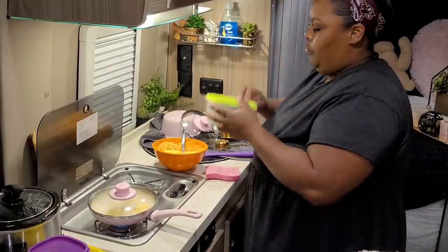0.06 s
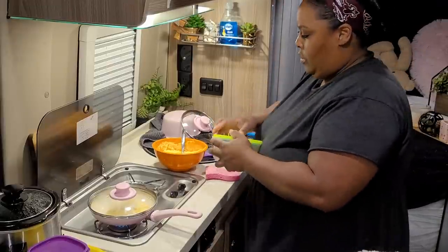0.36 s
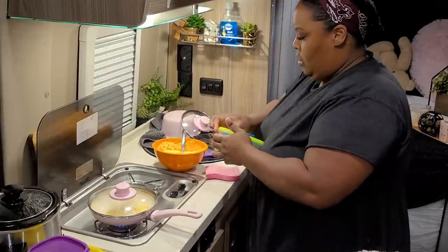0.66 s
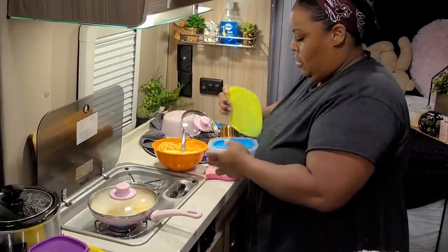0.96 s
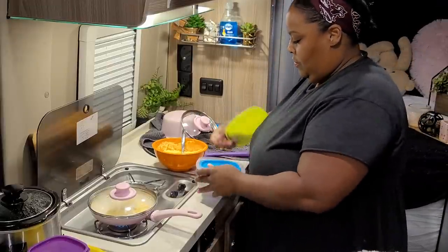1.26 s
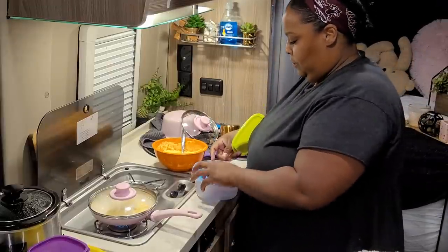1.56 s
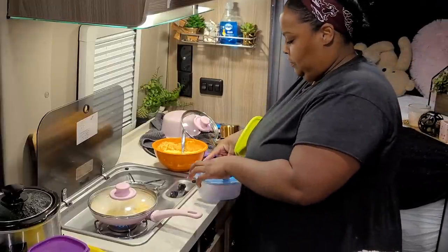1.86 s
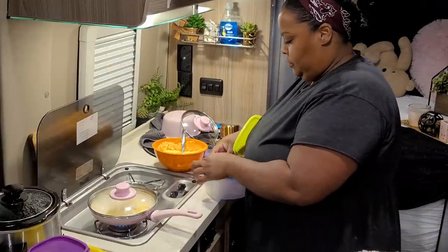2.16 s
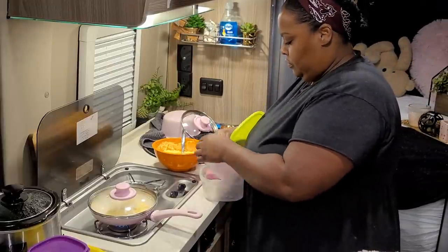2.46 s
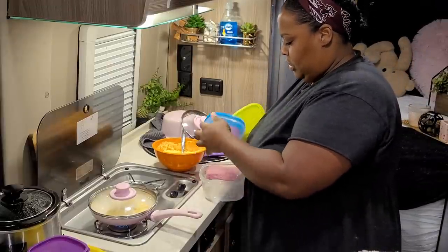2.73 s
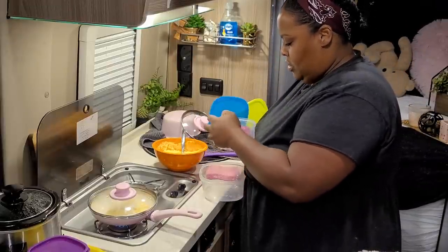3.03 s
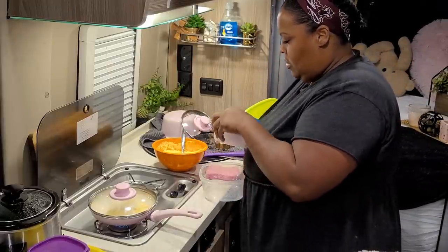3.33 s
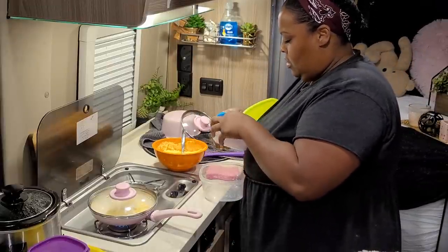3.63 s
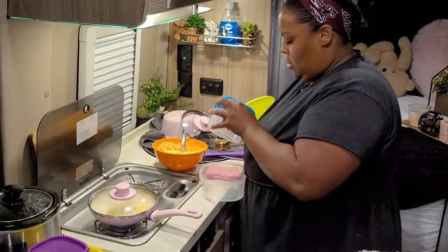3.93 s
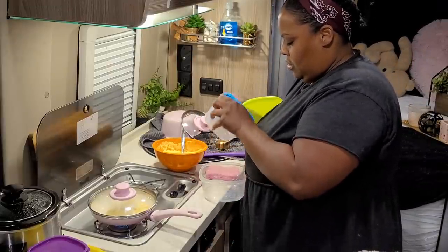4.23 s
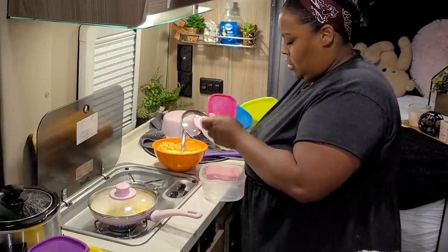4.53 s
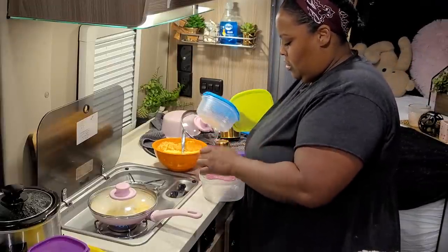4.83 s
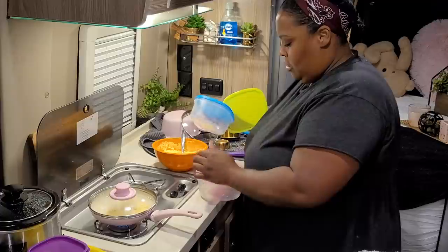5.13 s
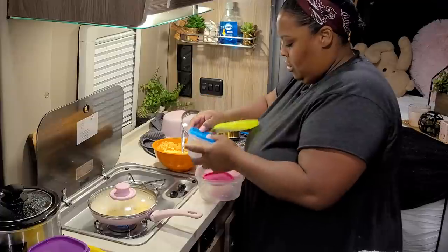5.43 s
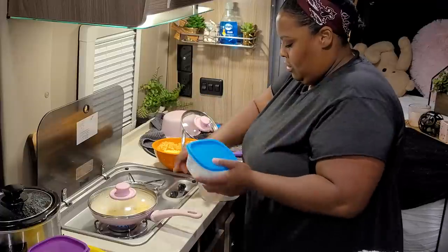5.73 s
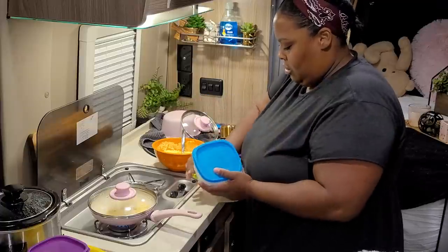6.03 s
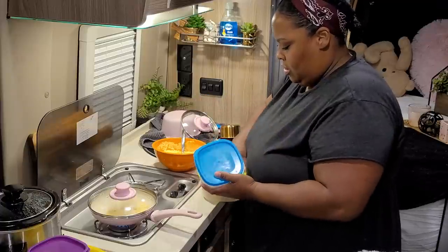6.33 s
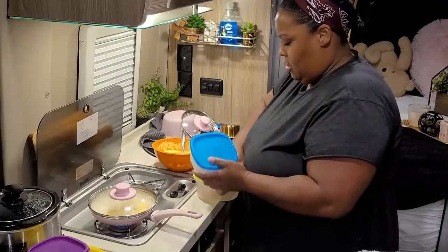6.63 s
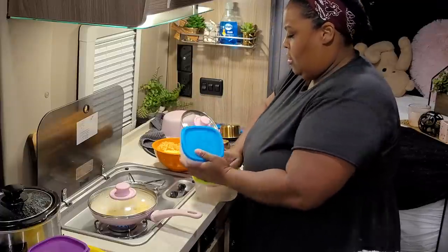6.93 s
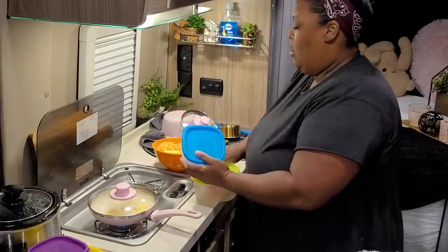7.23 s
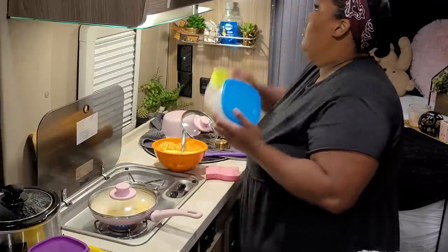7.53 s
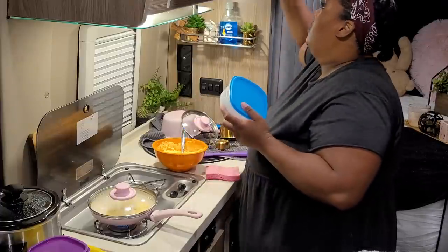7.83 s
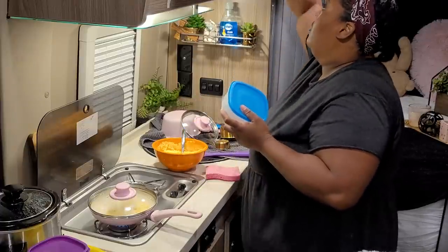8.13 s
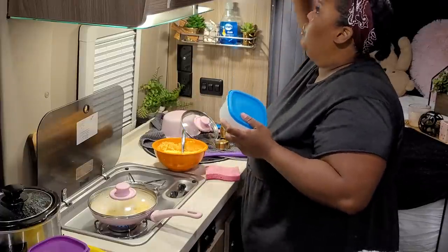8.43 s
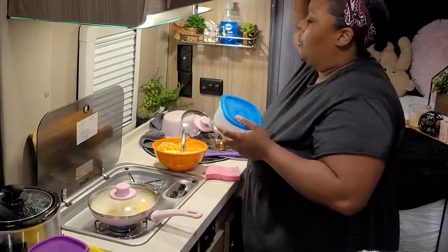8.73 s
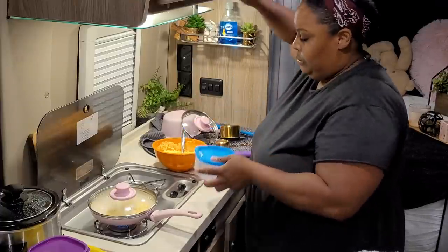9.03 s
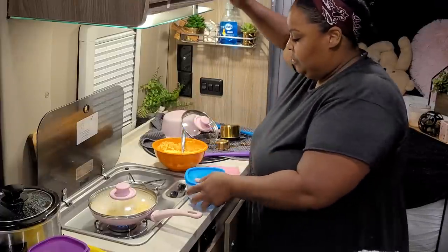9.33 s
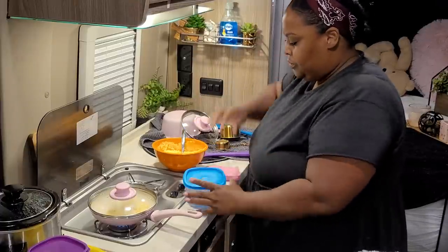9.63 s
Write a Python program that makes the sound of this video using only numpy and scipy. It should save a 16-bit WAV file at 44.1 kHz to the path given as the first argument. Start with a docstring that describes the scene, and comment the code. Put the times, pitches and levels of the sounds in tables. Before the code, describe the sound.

Hands sort plastic containers and lids with hollow clacks and short scrapes in a small kitchen, before a cupboard door slams.

```python
"""A cramped kitchen: plastic food tubs and lids are sorted by hand and knock, click and scrape together.
Each contact rings a thin wall and a stiff rim and echoes off the near cupboards. Fingertips rustle and
squeak on the plastic. Near the end a cupboard door bangs shut, booming through the cabinets and
overloading the microphone. An appliance hums faintly underneath, with a soft hiss of room air."""
import sys
import numpy as np
from scipy import signal
from scipy.fft import rfft, irfft
from scipy.io import wavfile

SR = 44100
rng = np.random.default_rng(int(sys.argv[2]) if len(sys.argv) > 2 else 0)


def log_audio(samples):
    """Write samples as a 16-bit WAV file to the path given in sys.argv[1]."""
    # one column per channel
    frames = np.atleast_2d(samples).T
    # limit to full scale, then quantise
    limited = np.clip(frames, -1, 1)
    pcm = np.round(limited * 32767).astype(np.int16)
    wavfile.write(sys.argv[1], SR, pcm)


N = 435708
RING_TIME = np.arange(int(SR / 4)) / SR  # seconds since a contact
FREQS = np.fft.rfftfreq(N, 1 / SR)

# Knocks and clicks. Thud (bass), hollow (low middle) and snap (treble) are relative to the level.
# (time [s], piece, level [dB], thud [dB], hollow [dB], snap [dB], contact time [s])
KNOCKS = [(0.084, "tight lid", -54, -6, -2, 0, 0.0017), (0.227, "seal", -36, -16, -4.5, -30, 0.00051),
          (.733, "tub side", -27, -15, 1, -3, 0.0017), (.775, "seal", -29, -21, -5, -7, .0024),
          (0.83, "tub side", -28.5, -30, 2, -25, 0.0021), (.922, "tub side", -35, -16, 2, -11, 0.0023),
          (1.288, "seal", -12.5, -22, 0.5, -12, 0.00067), (1.349, "seal", -13.5, -7, -1, -7, 0.0019),
          (1.375, "large lid", -22, -6, 3, -8, 0.00042), (1.399, "tub side", -20.5, -10, -2, -13, 0.0021),
          (1.445, "tub base", -31.5, -9, -4, -10, 0.0035), (1.485, "tub side", -33, -5.5, 0, -15, .001),
          (1.634, "tub side", -41.5, -2.5, -9, -22, 0.0021), (1.674, "tub base", -36.5, -13, -2, -12, .002),
          (1.818, "nested", -21.5, -21, -2.5, -5.5, 0.0044),
          (1.866, "tub side", -29.5, -8, -1, -14, 0.0025), (2.074, "seal", -39.5, -21, -3, -10, 0.0025),
          (2.264, "large tub", -23, -4, -23, -10, 0.0032), (2.333, "large lid", -26, -2.5, -23, -9, 0.004),
          (2.397, "small tub", -31, -12, 0, -11, .0016), (2.455, "small tub", -26.5, -25, 7, -6, 0.0016),
          (2.475, "small tub", -29.5, -18, 6.5, -15, 0.00054),
          (2.502, "small tub", -29.5, -29, 7.5, -10.5, 0.0033),
          (2.574, "small tub", -29.5, -26, 3, -3, 0.00069),
          (2.602, "small tub", -38.5, -21, 8.5, -13, .001), (2.715, "seal", -41.5, -28, -13, -10, .001),
          (2.754, "tub base", -31, -34, 2.5, -11.5, .0006),
          (2.799, "small tub", -43.5, -26, -4, -0.5, 0.003),
          (2.897, "small tub", -37.5, -24, 4.5, -10, 0.00055),
          (2.915, "small lid", -30, -37, -4, -10, .0017),
          (3.057, "small lid", -35.5, -34, -2.5, -13, 0.0024),
          (3.26, "small lid", -30.5, -11.5, -4.5, -18.5, 0.0099),
          (3.316, "tub base", -42, -25, 4.5, -16, .0006), (3.656, "tub base", -24.5, -19, 2.5, -9, .0006),
          (3.845, "small tub", -30, -34, 0.5, -12, 0.00046),
          (4.281, "large lid", -27.5, -35, -5, -26, 0.0023),
          (4.301, "small lid", -32, -32, 1.5, -25, 0.0026),
          (4.345, "tub base", -39.5, -25, 8.5, -20, 0.0027),
          (4.451, "small lid", -24.5, -17, -0.5, -6.5, 0.00069),
          (4.474, "small lid", -23.5, -15, -1.5, -7.5, 0.0056),
          (4.562, "small lid", -29.5, -28, -37, -17, 0.0028),
          (4.978, "tub base", -16.5, -24, 3, -5, 0.00061), (4.982, "seal", -14, -12, -18, -27, 0.0012),
          (5.03, "tub base", -30.5, -9, -6, -5.5, 0.00084),
          (5.062, "nested", -18.5, -10, -1, -7.5, 0.00072), (5.112, "tub base", -27, -8, 0, -17, .002),
          (5.123, "small tub", -20, -4, 3.5, -1.5, 0.00037),
          (5.163, "nested", -25.5, -4.5, 1.5, -2, 0.0005), (5.203, "nested", -22.5, -12, 1, -6.5, 0.00066),
          (5.218, "tight lid", -31.5, -5.5, -3, -1, .0014), (5.252, "nested", -27.5, -2, -18, -6.5, 0.0029),
          (5.302, "large lid", -33, -22, -3, -22, 0.0016), (5.378, "small tub", -32, -24, -0.5, -5, .0015),
          (5.68, "large lid", -18, -20.5, -25, -8, 0.0009),
          (5.752, "large lid", -30.5, -19, -16, -12, 0.0037), (5.791, "tub base", -16, -16, -1, -12, .0018),
          (5.807, "tub base", -28.5, -11, 7.5, -6.5, 0.0014),
          (5.864, "tub side", -38.5, -10, 5.5, -14, 0.00098),
          (6.127, "large lid", -32.5, -35, -0.5, -11, 0.00074),
          (6.295, "large lid", -23.5, -14, -3, -18.5, 0.0015),
          (6.327, "seal", -25.5, -14, -4, -11.5, 0.00053), (6.456, "tub side", -30.5, -3.5, 4, -7, 0.0053),
          (6.475, "large lid", -27, -13, -7.5, -21, 0.0022), (6.566, "seal", -42.5, -8, -29, -22, 0.0013),
          (6.639, "worktop", -26.5, 0.5, -9, -19, 0.0013),
          (6.642, "tight lid", -11.5, -15.5, -2, -0.5, 0.0017),
          (6.854, "worktop", -31.5, 0, -19, -10, 0.0022), (6.889, "worktop", -26, 0, .5, -18, 0.00049),
          (7.23, "large lid", -33.5, -13, -1, -15.5, .0006),
          (7.321, "nested", -37.5, -2.5, -0.5, -23, .0007), (7.473, "seal", -19, -21, -3.5, -16.5, 0.00036),
          (7.631, "small lid", -34.5, -7, -6, -16, 0.0076),
          (7.684, "small lid", -36.5, -14, -11, -17, 0.0025),
          (7.736, "nested", -31, -3, -2.5, -5.5, 0.00051),
          (7.865, "large lid", -36.5, -3, 11, -10.5, .0008),
          (7.928, "large lid", -25, -20, 2.5, -17, 0.00096),
          (8.052, "tub side", -36.5, -12, 2, -20, 0.0014),
          (8.116, "large tub", -40.5, -2, -16, -13, 0.00055),
          (8.174, "large tub", -23, -1.5, -1.5, -10.5, 0.00093),
          (8.19, "large tub", -29, 9, -3, -13, .0006), (8.256, "large tub", -23, 8.5, -1.5, -16, 0.00043),
          (8.286, "worktop", -24, -3, -7, -17, .0006), (8.321, "large tub", -26, .5, 2, -16.5, .002),
          (8.484, "large tub", -18, -22, -0.5, -11.5, .0007),
          (8.518, "large tub", -20.5, -1, 1, -18.5, 0.0061),
          (8.827, "tub base", -44.5, -12, 8, -11, 0.0023), (9.253, "door", -6.5, -14, -0.5, -4.5, .0006),
          (9.287, "seal", -13, -5, -3, -12.5, 0.0025), (9.308, "large tub", -22, -27, 4, -8, 0.0021),
          (9.425, "tub base", -25.5, -22, 1, -12, 0.00045), (9.51, "small tub", -40.5, 1, 3.5, -32, 0.0011),
          (9.736, "tub base", -25, -9.5, 4.5, -11.5, 0.0027), (9.793, "worktop", -40.5, 1, 0, -12, .002)]
# Plastic sliding on plastic: (time [s], length [s], piece, relative level [dB], thud [dB], snap [dB])
SCRAPES = [(.445, 0.018, "seal", -53.5, -17, 2.5), (.742, 0.076, "seal", -23, -25, -4),
           (.94, .05, "tub side", -40.5, -30, -11), (1.185, .03, "worktop", -52, 5, -8),
           (1.75, 0.12, "large lid", -29.5, -7.5, -23), (2.137, 0.076, "tub side", -24.5, -12.5, -15.5),
           (2.254, 0.064, "tub side", -24, -6, -8), (2.344, .04, "large lid", -35, -5.5, -7.5),
           (2.555, 0.04, "small tub", -29.5, -20, -16), (3.13, 0.037, "tight lid", -41, -40, -6),
           (3.191, 0.053, "small lid", -41, -22, -20), (3.74, 0.1, "small lid", -45, -26, -18),
           (4.149, 0.19, "small lid", -40, -28, -21), (4.499, 0.084, "tub side", -38, -14, -10),
           (5.276, 0.027, "small tub", -32, -5.5, -4.5), (5.709, 0.12, "tub side", -28, -10, -15.5),
           (6.148, 0.035, "seal", -30.5, -30, -10.5), (6.309, 0.042, "large lid", -24.5, -1.5, -20.5),
           (6.96, 0.076, "seal", -48, -6, -2), (7.25, .038, "worktop", -37.5, -17, -14),
           (7.494, 0.037, "small lid", -34.5, -4.5, -18), (7.944, 0.036, "tub side", -39.5, 5, -19),
           (8.223, 0.019, "large tub", -30.5, 5, -24), (8.343, 0.057, "large tub", -40, 6, -24),
           (8.454, 0.057, "large tub", -29, 7.5, -12), (8.534, 0.083, "large tub", -28.5, -2, -19.5),
           (8.599, 0.085, "nested", -37.5, -3, -27), (8.858, 0.017, "tub base", -41.5, -8, -16),
           (9.852, 0.034, "tub side", -32.5, -10, -11.5)]
# The things that are struck, by name. A ring time, or t60, is how long a ring takes to fall by 60 dB.
# (wall pitch [Hz], rim pitch [Hz], ring time [s], low tones left minus right [dB], top treble [dB])
PIECES = {"small tub": (465, 1680, 0.092, .5, 2.9), "tub base": (483.5, 1059, 0.17, 1, -2),
          "tub side": (555, 820, 0.1, 2.1, 0.9), "large tub": (379.5, 1049, 0.16, -3.5, 0.5),
          "nested": (325, 1300, 0.12, 1, 2.4), "small lid": (823, 1075.5, 0.08, 0.5, 1),
          "large lid": (713.5, 1034, 0.19, 2, 2.5), "seal": (770, 1300, 0.11, 0.5, 3),
          "door": (261, 1324, 0.13, -3.5, -14), "tight lid": (760, 2200, 0.073, 1.3, 5.8),
          "worktop": (243, 1254, 0.1, 2, 4)}
# Tone colour of the noise of a contact: (frequency [Hz], relative level [dB])
CRACK_COLOUR = [(40, -26), (120, 1.5), (300, 7.5), (800, 15), (1600, 2.5), (3000, -1), (4000, -8),
                (6500, -12), (10000, -19.5), (16000, -28.5)]


def undb(db):
    """Turn decibels into a plain multiplier."""
    return 10 ** (np.asarray(db) / 20)


def unit(x):
    """Scale a sound to an average (rms) level of 1."""
    return x / np.sqrt(np.mean(x ** 2))


def pan(db):
    """Gains that make the left side db louder than the right."""
    return undb(np.array([[db], [-db]]) / 2)


def fade(t60):
    """A smooth dying away, by 60 dB in t60 seconds."""
    return np.exp(-np.log(1000) * RING_TIME / t60)


def rise(rise_s):
    """A smooth start, from 0 towards 1."""
    return 1 - np.exp(-RING_TIME / rise_s)


def add(out, start_s, sound):
    """Mix a sound in at the given time."""
    i = int(start_s * SR)
    out[:, i:i + sound.shape[-1]] += sound[..., :N - i]


def split(x, hz, order=3):
    """The parts of a sound below and above a frequency."""
    return [signal.sosfilt(signal.butter(order, hz, kind, fs=SR, output="sos"), x)
            for kind in ("low", "high")]


def stereo_noise(colour, size, width):
    """Noise shaped by (frequency [Hz], level [dB]) points, its bass alike in both ears."""
    hz, db = np.transpose(colour)
    gain = undb(np.interp(np.log(np.fft.rfftfreq(size, 1 / SR) + 1), np.log(hz), db))
    middle, side = irfft(rfft(rng.standard_normal((2, size))) * gain, size)
    side = split(side, hz=420, order=2)[1]
    return unit(middle + width * np.array([side, -side]))


def ring(hz, t60, wide_hz=400):
    """One dying tone; all but the bass reaches the two microphones out of step."""
    phase = min(hz / wide_hz, 1) ** 2 * rng.standard_normal((2, 1))
    return np.sin(2 * np.pi * hz * RING_TIME + phase) * fade(t60)


def room_air(db=-51.5):
    """The air of the room: a wide, soft hiss."""
    # Tone colour of the hiss: (frequency [Hz], relative level [dB])
    air_colour = [(100, -57.5), (170, -8.5), (301, 1.5), (416, -6), (466, 0.5), (522, 0.5), (778, -21),
                  (1460, -12), (1570, -15), (2050, -16.5), (2170, -15.5), (3240, -8), (9040, -28.5),
                  (12300, -27), (16000, -34)]
    return undb(db) * stereo_noise(air_colour, N, width=1)


def appliance_hum(side_db=-15):
    """An appliance hums: narrow bands of low noise that waver, nearly alike in both ears."""
    # Bands of the hum: (frequency [Hz], width [Hz], level [dB])
    hum_bands = [(33, 26, -59), (54.6, 15, -57.5), (74.4, 14, -49), (119, 69, -60.5)]
    hum = 0
    for hz, width_hz, db in hum_bands:
        band = 1 / (1 + (2 * (FREQS - hz) / width_hz) ** 2)
        middle, side = irfft(rfft(rng.standard_normal((2, N))) * band, N)
        hum = hum + undb(db) * unit(middle + undb(side_db) * np.array([side, -side]))
    return hum


def hinge(peak_s=9.29, swing_s=0.13, db=-43):
    """The cupboard door's hinge hisses softly as it swings shut and settles."""
    # (frequency [Hz], relative level [dB])
    colour = [(800, -12.5), (1800, -16), (2500, -5), (3400, -17), (4800, -9), (6000, -20), (9000, -29),
              (16000, -35)]
    swing = np.exp(-((np.arange(N) / SR - peak_s) / swing_s) ** 2)
    return stereo_noise(colour, N, width=0.5) * undb(db) * swing


def cabinet_booms(gain_db=-3, lag_s=0.0005):
    """Cabinet panels boom after a bump; a long, soft push leaves only the lowest tones."""
    # Bumps that reach the cabinets: (time [s], relative level [dB], push length [s])
    bumps = [(0.744, -27, 0.0032), (1.365, -35, 0.002), (6.641, -23, 0.002), (6.881, -25, 0.011),
             (8.272, -20.5, 0.0028), (8.592, -21.5, 0.0046), (9.054, -7.5, 0.028), (9.258, 1, 0.0013),
             (9.296, -2, 0.0043), (9.316, -3.5, 0.0046), (9.421, -18, 0.0049)]
    # Tones of the panels: (frequency [Hz], relative level [dB], ring time [s])
    panel_tones = [(62.8, 0.5, 0.23), (80.4, 2.5, 0.16), (115, -12.5, 0.31), (263.4, -13.5, 0.18),
                   (383, -17.5, 0.15), (460, -29, 0.15), (828, -5, 0.11)]
    out = np.zeros((2, N))
    for start_s, db, push_s in bumps:
        boom = sum(undb(tone_db) / np.hypot(1, hz * push_s / 2) * ring(hz, t60)
                   for hz, tone_db, t60 in panel_tones)
        add(out, start_s, -undb(db + gain_db) * boom * rise(push_s))
    out[0] = np.roll(out[0], int(lag_s * SR))  # the cabinets stand to the right
    return split(out, hz=62)[1] * pan(db=-1)  # small panels give off little deep bass


def cupboard_echoes():
    """Crowded echoes in the cramped room; the treble dies first."""
    low, high = split(stereo_noise(CRACK_COLOUR, len(RING_TIME), width=1.02), hz=1500)
    return low * fade(t60=0.14) + high * fade(t60=0.13)


def tub_tap(wall_hz, rim_hz, t60, contact_s, wall_db=0, rim_db=-3, shared_db=-6, detune=0.0283):
    """One tap on a hand-held tub: a crack, a ringing wall and rim, and echoes from the cupboards."""
    # Tones that all the tubs share: (frequency [Hz], relative level [dB], base ring time [s])
    shared_tones = [(344.8, -2.5, 0.031), (470.8, -4, 0.18), (545.8, 3.5, 0.051), (707, 10, 0.063),
                    (805.6, 11.5, 0.037), (1018, -3, 0.06), (1412, -1, 0.027), (1595, -7.5, 0.037),
                    (1938, -11, 0.087), (2074, -28, 0.14), (2704, -16.5, 0.16), (3030, -11, 0.044),
                    (3490, -20, 0.18), (5090, -59, 0.13), (5600, -23.5, 0.11), (8230, -30, 0.087)]
    rim = undb(rim_db) * ring(rim_hz, 0.61 * t60)
    rim_overtone = undb(-11) * ring(1.97 * rim_hz, 0.15 * t60)
    ringing = undb(wall_db) * ring(wall_hz, t60) + rim + rim_overtone
    for hz, db, base_t60 in shared_tones:
        # the grip damps and detunes each tone; the spot that is hit changes its strength
        grip, spot = rng.standard_normal(2)
        tone = ring(hz * (1 + detune * grip), np.sqrt(base_t60 * t60))
        ringing += undb(shared_db + db + 3 * spot) * tone
    crack = stereo_noise(CRACK_COLOUR, len(RING_TIME), width=0.91) * fade(t60=0.079)
    crack[1] = np.roll(crack[1], 2)  # the right microphone is a little further off
    tail = (ringing + undb(-9) * cupboard_echoes()) * rise(0.0025)
    return (crack + tail) * rise(contact_s)


def gloss(x, db):
    """Each piece gets its own top treble: most are brighter, the door much duller."""
    return x + (undb(db) - 1) * split(x, hz=8000, order=1)[1]


def balance(x, length_s, db, thud_db, hollow_db, snap_db, low_pan_db, high_pan_db=0.56):
    """Set a contact's four bands: weight gives the thud, the cavity the hollow tone, an edge the snap."""
    low, high = split(x, hz=786)
    thud, hollow = split(low, hz=277)
    middle, snap = split(high, hz=1910)
    out = 0
    for band, band_db, pan_db in [(thud, thud_db, low_pan_db), (hollow, hollow_db, low_pan_db),
                                  (middle, 0, high_pan_db), (snap, snap_db, high_pan_db)]:
        start_level = np.sqrt(np.mean(band[:, :int(length_s * SR)] ** 2))
        out = out + band / start_level * undb(db + band_db) * pan(pan_db)
    return out


def slips(size, per_s, uneven_db):
    """Sticking and slipping: uneven jolts at random moments."""
    return (rng.random(size) < per_s / SR) * undb(uneven_db * rng.standard_normal(size))


def busy_hands(lead_s=0.039, linger_s=0.092, busy_contacts=3.72):
    """How busy the hands are, 0 to 1: it rises where contacts crowd together and lingers after them."""
    times = np.arange(0, N / SR, 0.01)
    since = times - np.array([row[0] for row in KNOCKS + SCRAPES])[:, None]
    reach_s = np.where(since < 0, lead_s, linger_s)
    crowd = np.exp(-(since / reach_s) ** 2).sum(axis=0)
    return np.interp(np.arange(N) / SR, times, np.tanh(crowd / busy_contacts))


def finger_rustle(rest_db=-61.5, busy_boost_db=27.5, fingers=4):
    """Fingertips creep over the walls: sparse, soft little jolts, stronger when the hands are busy."""
    rustle = 0
    for wall_hz, rim_hz in rng.uniform([550, 950], [850, 1600], (fingers, 2)):
        tap = tub_tap(wall_hz, rim_hz, t60=0.027, contact_s=0.0026, rim_db=5.5)
        jolts = slips(N, per_s=22, uneven_db=5)
        rustle = rustle + signal.oaconvolve(tap, [jolts], axes=1)[:, :N]  # one tap for each jolt
    soft = split(rustle, hz=2200, order=1)[0]
    light = split(soft, hz=620)[1]
    return unit(light) * undb(rest_db + busy_boost_db * busy_hands())


def lid_rubs(squeak_hz=1780, wander=0.045):
    """Skin sticks and slips fast on a lid: a soft hiss and a faint, unsteady squeak swell and stop."""
    # Fingertip slides: (time [s], length [s], hiss level [dB], squeak level [dB])
    slides = [(1.027, 0.054, -47.5, -45), (2.031, 0.11, -51, -71), (5.501, 0.14, -53.5, -68),
              (6.005, 0.14, -68, -54), (6.207, 0.15, -62, -52), (9.055, 0.027, -48, -68)]
    # Tone colour of the hiss of skin: (frequency [Hz], relative level [dB])
    skin_colour = [(500, -12), (1800, 3), (6000, -9), (16000, -16)]
    out = np.zeros((2, N))
    for start_s, length_s, hiss_db, squeak_db in slides:
        wobble = unit(split(rng.standard_normal(len(RING_TIME)), hz=160)[0])
        hz = squeak_hz * (1 + wander * wobble)
        squeak = undb(squeak_db) * np.sin(2 * np.pi * np.cumsum(hz) / SR)
        hiss = undb(hiss_db) * stereo_noise(skin_colour, len(RING_TIME), width=1)
        swell = np.sin(np.pi * np.minimum(RING_TIME / length_s, 1))
        add(out, start_s, (hiss + squeak) * swell)
    return out


def scrapes(gain_db=-1, hollow_db=1.5, ease_s=0.0073, contact_points=3):
    """An edge slides over a tub: several points of contact stick and slip, each with its own ring."""
    out = np.zeros((2, N))
    for start_s, length_s, piece, db, thud_db, snap_db in SCRAPES:
        wall_hz, rim_hz, _, pan_db, gloss_db = PIECES[piece]
        pressure = rise(ease_s) * (RING_TIME < length_s)
        scrape = 0
        for _ in range(contact_points):
            jolts = slips(len(RING_TIME), per_s=260, uneven_db=4) * pressure
            jolts[0] = 1.0  # the edge lands
            tap = tub_tap(wall_hz, rim_hz, t60=0.12, contact_s=0.0013,
                          wall_db=-1.5, rim_db=-1.5, shared_db=-8, detune=0.0575)
            scrape = scrape + signal.fftconvolve(tap, [jolts], axes=1)
        scrape = gloss(scrape, gloss_db)
        scrape = balance(scrape, length_s, db + gain_db, thud_db, hollow_db, snap_db, pan_db)
        add(out, start_s - ease_s / 2, scrape)
    return out


def knocks(blow_s=0.034, lead_in_db=-11):
    """Taps on tubs, lids, worktop and door; a faint, brief swell of noise softens the start of each."""
    out = np.zeros((2, N))
    for start_s, piece, db, thud_db, hollow_db, snap_db, contact_s in KNOCKS:
        wall_hz, rim_hz, t60, pan_db, gloss_db = PIECES[piece]
        tap = gloss(tub_tap(wall_hz, rim_hz, t60, contact_s), gloss_db)
        add(out, start_s, balance(tap, blow_s, db, thud_db, hollow_db, snap_db, pan_db))
        lead_s = 0.0018 + 2.5 * contact_s
        swell = np.interp(RING_TIME, [0, lead_s, 2 * lead_s], [0, 1, 0])
        lead_in = stereo_noise(CRACK_COLOUR, len(RING_TIME), width=0.16) * swell
        add(out, start_s - lead_s, lead_in * undb(db + lead_in_db + snap_db / 2))
    return out


def scene():
    """Everything heard at the worktop."""
    handling = knocks() + scrapes() + finger_rustle() + lid_rubs()
    return handling + cabinet_booms() + hinge() + appliance_hum() + room_air()


def record(dry, bright_hz=6000, left_db=3, top_hz=16000):
    """The left microphone is the brighter one; the loudest blows clip; the highest treble is cut."""
    tilt_db = left_db / 2 * FREQS ** 4 / (FREQS ** 4 + bright_hz ** 4)
    heard = irfft(rfft(dry) * undb([tilt_db, -tilt_db]), N)
    treble_cut = signal.ellip(8, 0.2, 80, top_hz, fs=SR, output="sos")
    return signal.sosfilt(treble_cut, np.clip(heard, -1, 1))


dry = scene()
out = record(dry)
log_audio(out)
```